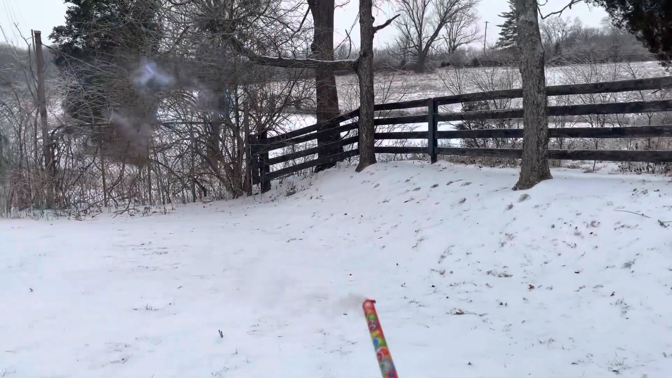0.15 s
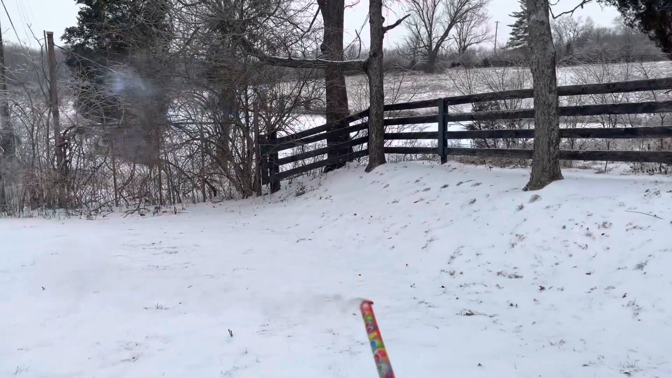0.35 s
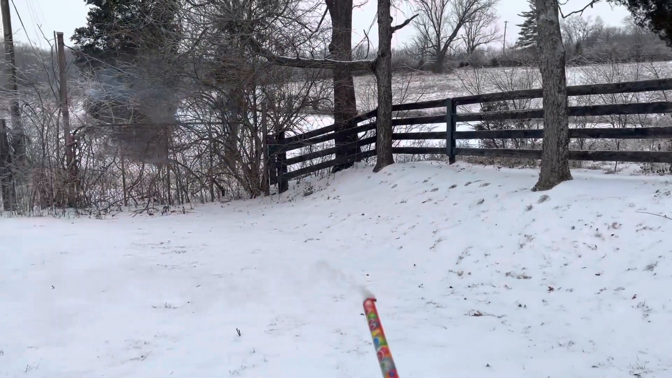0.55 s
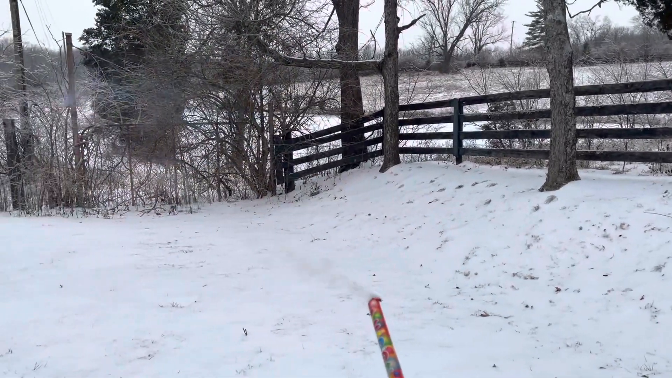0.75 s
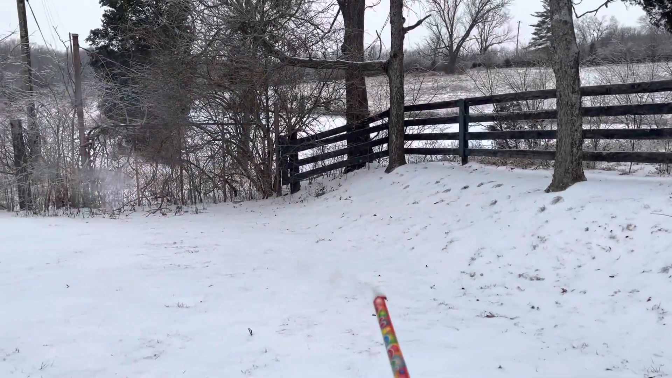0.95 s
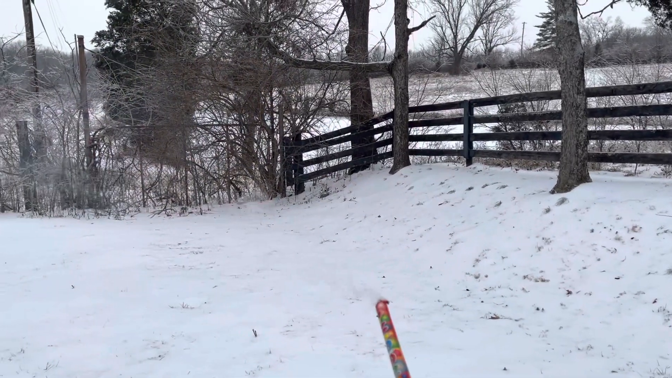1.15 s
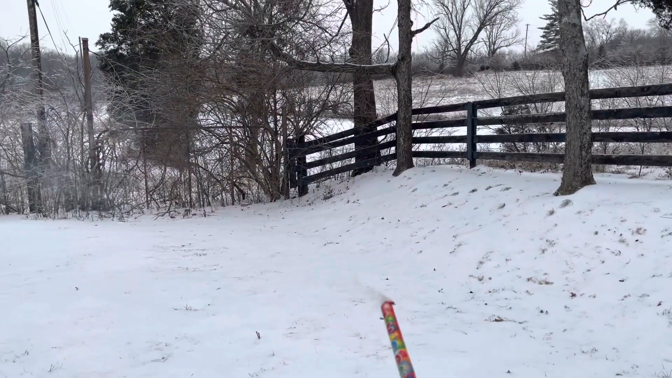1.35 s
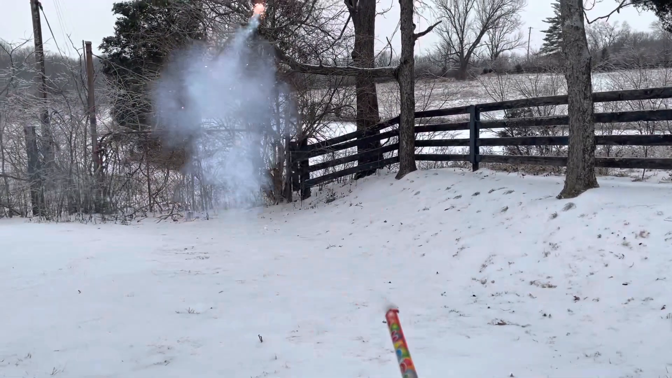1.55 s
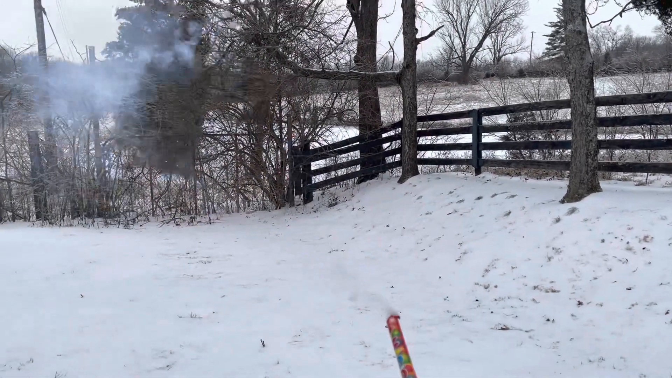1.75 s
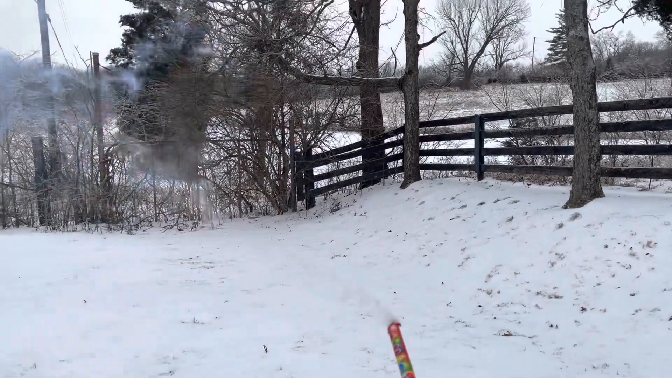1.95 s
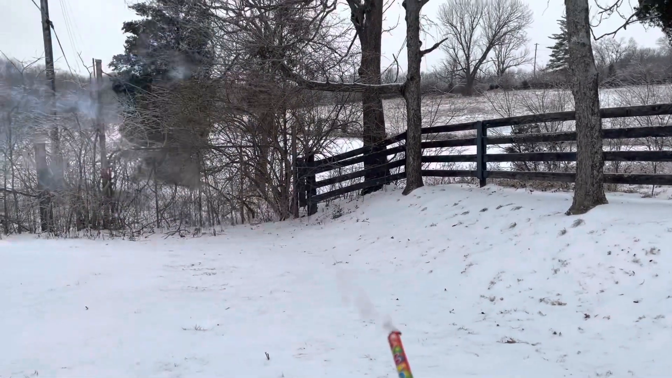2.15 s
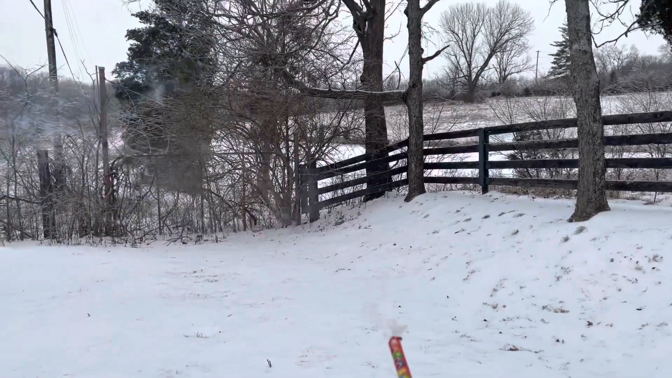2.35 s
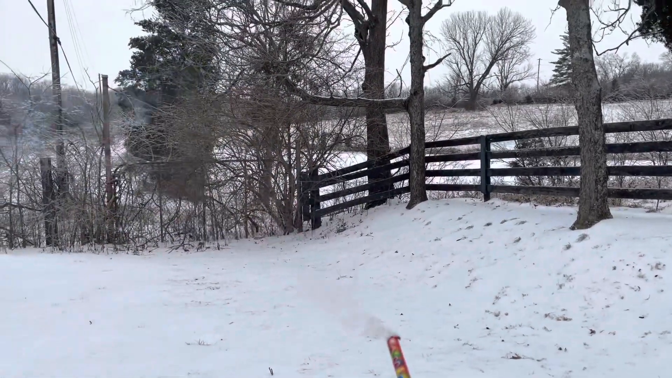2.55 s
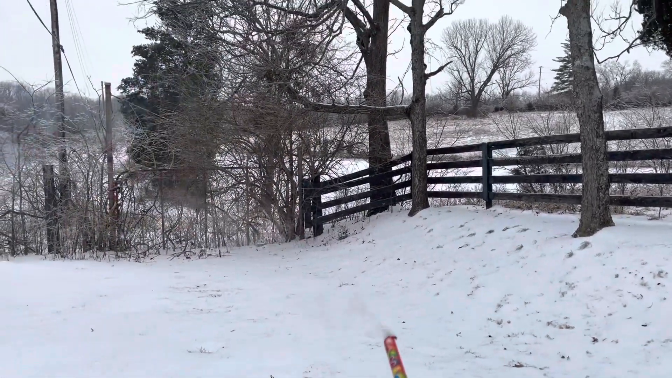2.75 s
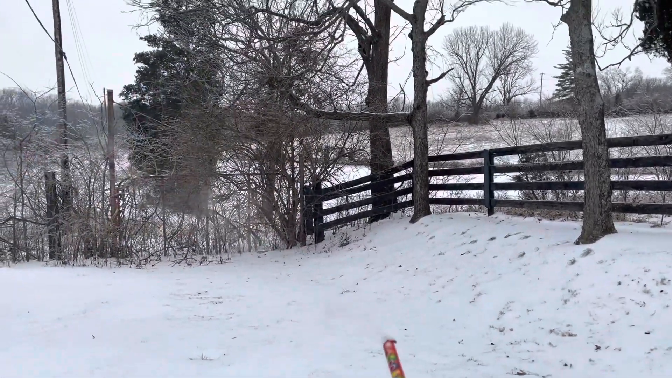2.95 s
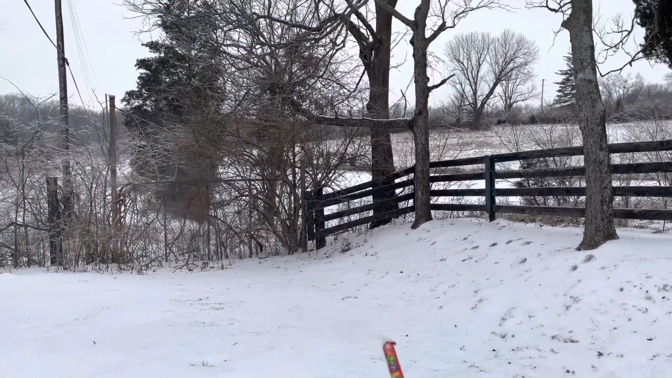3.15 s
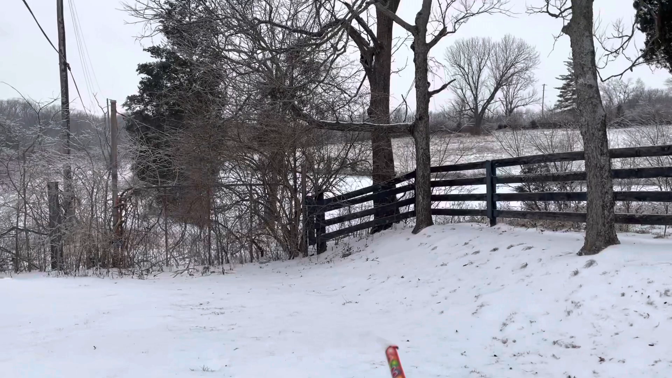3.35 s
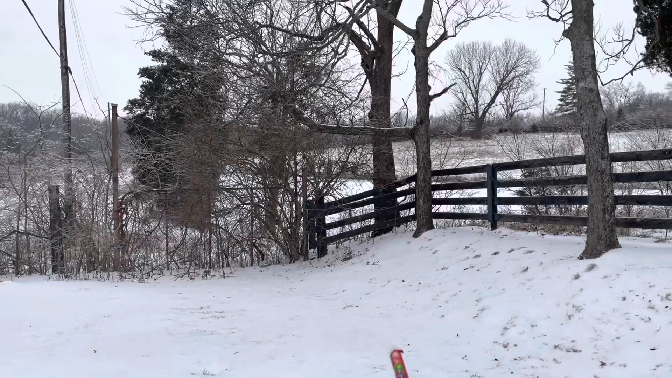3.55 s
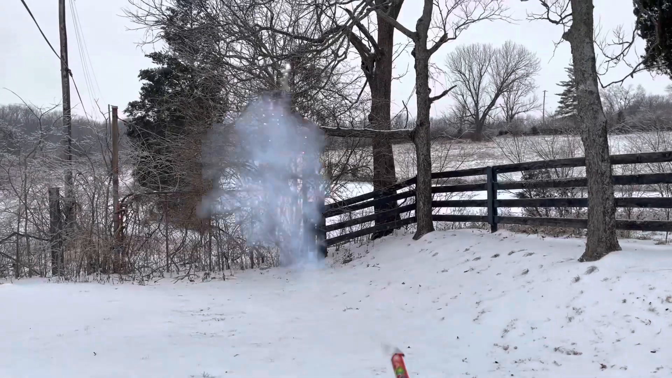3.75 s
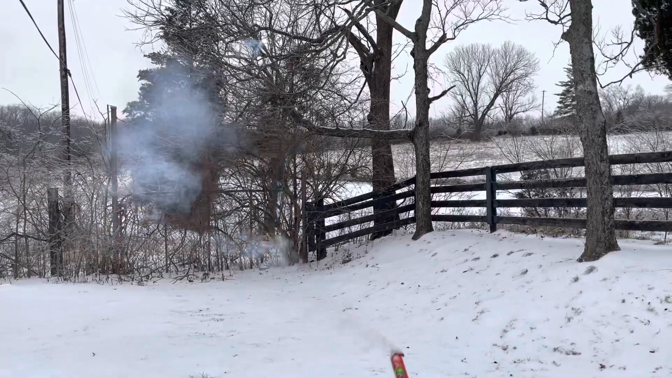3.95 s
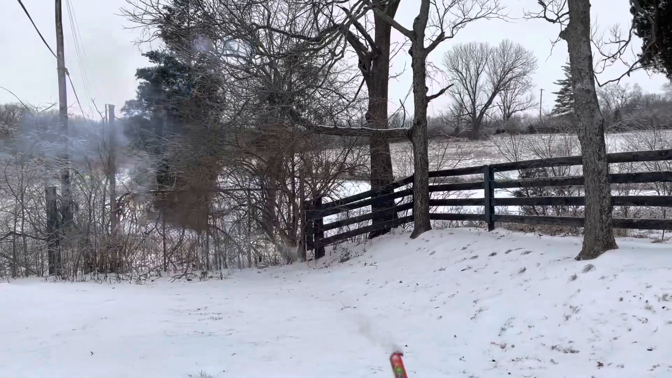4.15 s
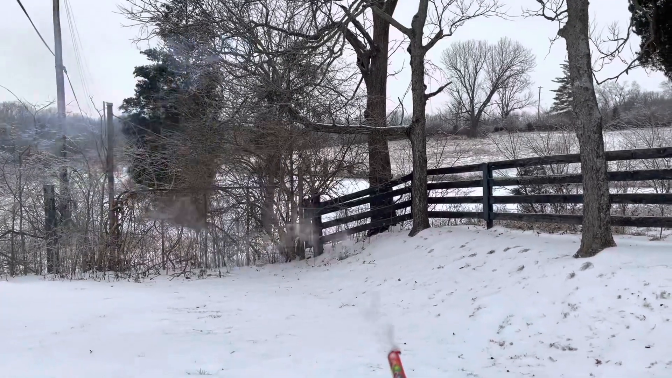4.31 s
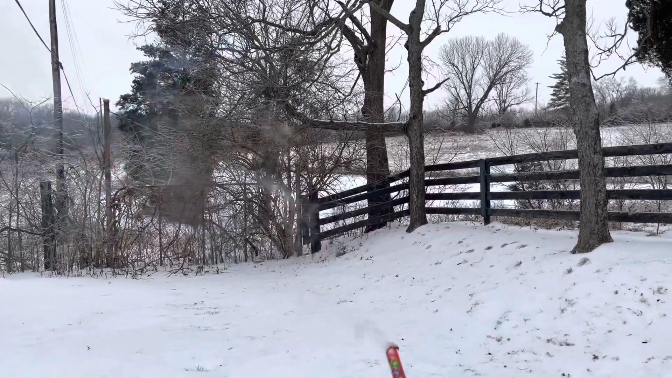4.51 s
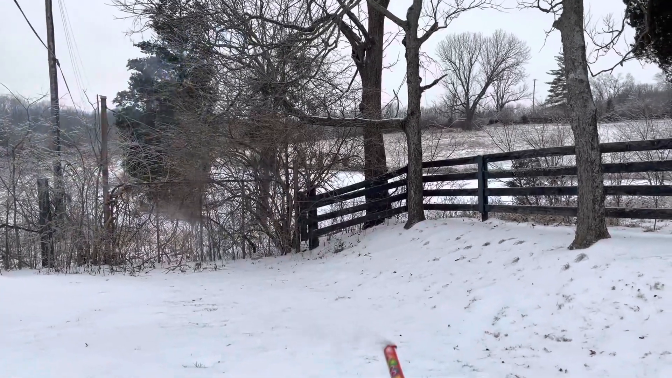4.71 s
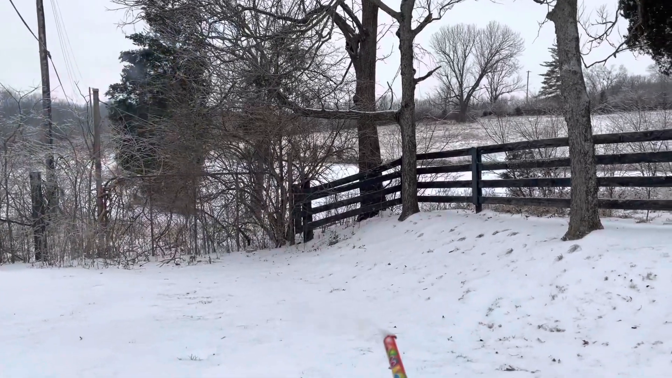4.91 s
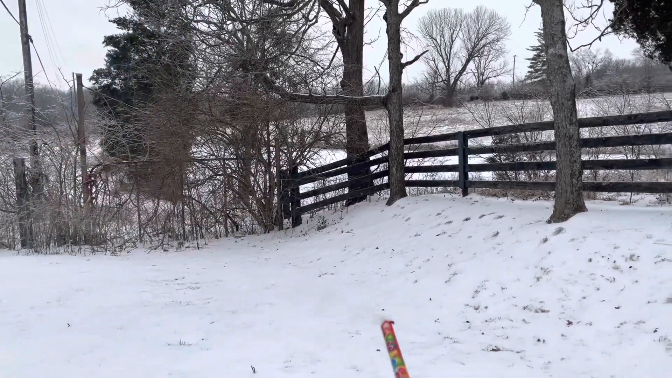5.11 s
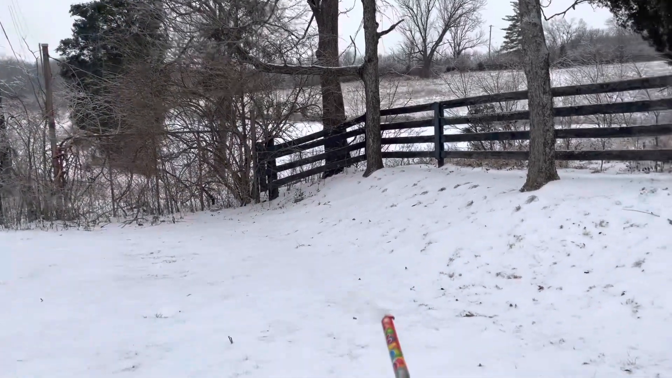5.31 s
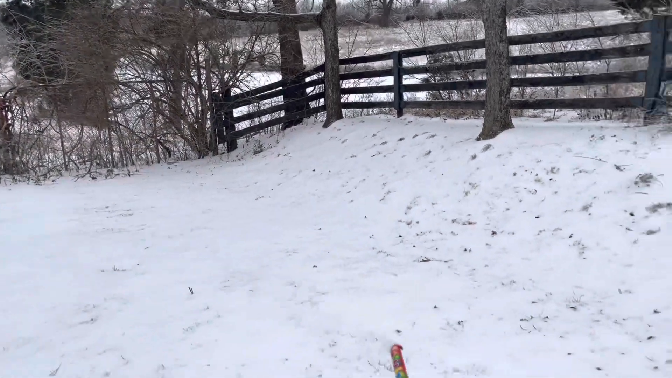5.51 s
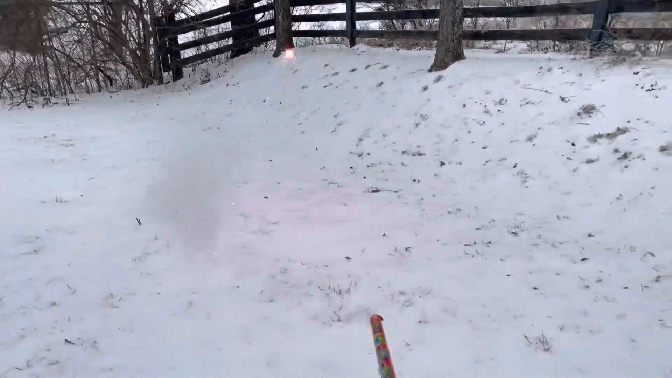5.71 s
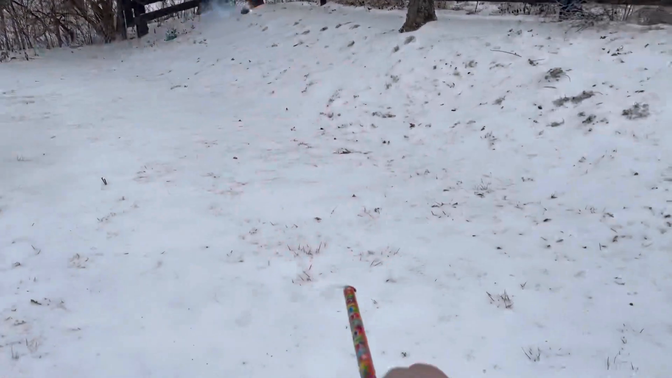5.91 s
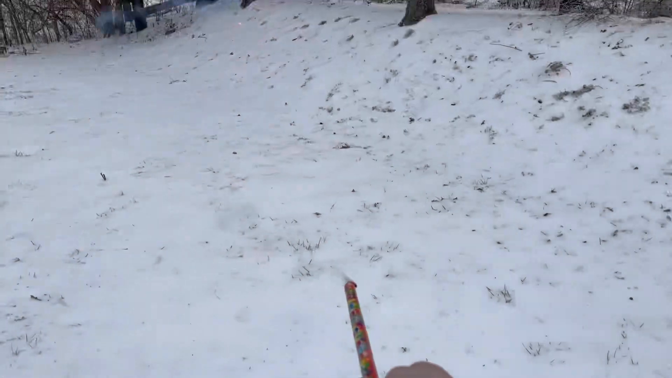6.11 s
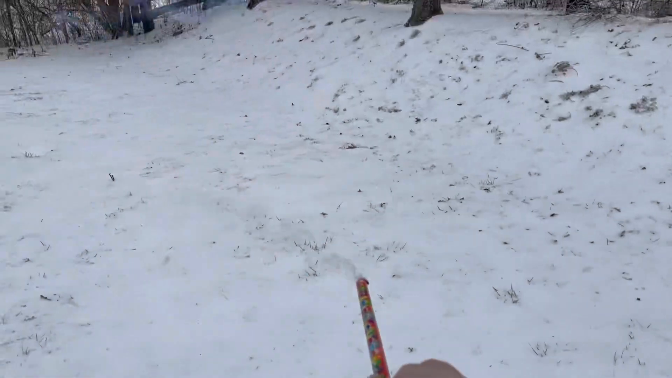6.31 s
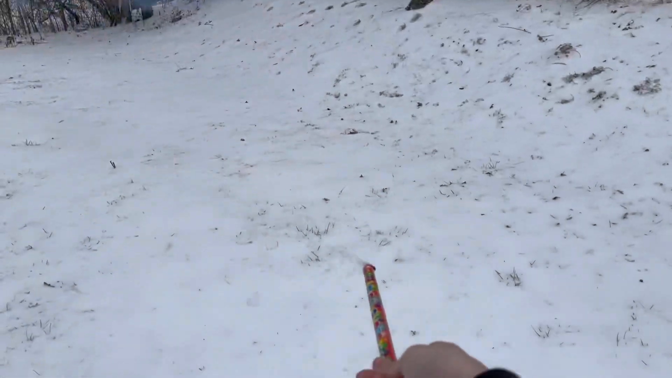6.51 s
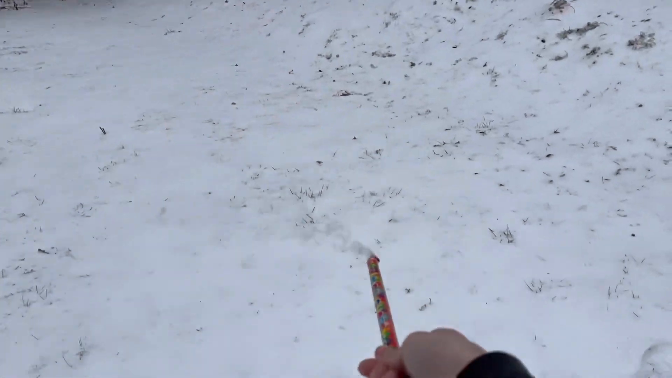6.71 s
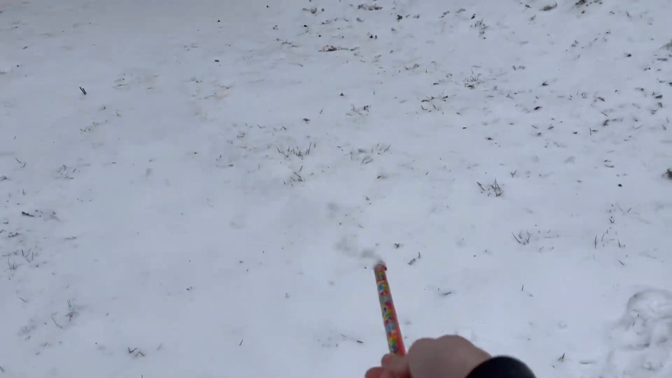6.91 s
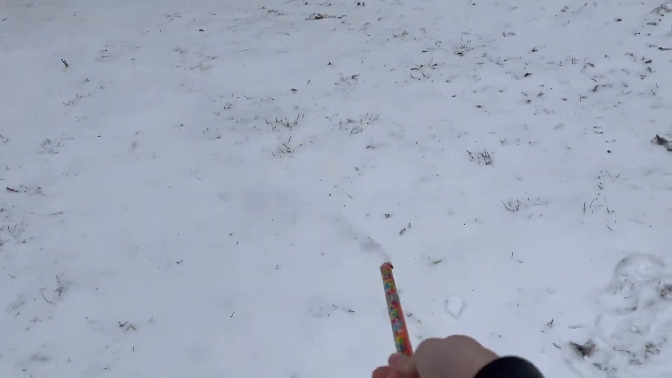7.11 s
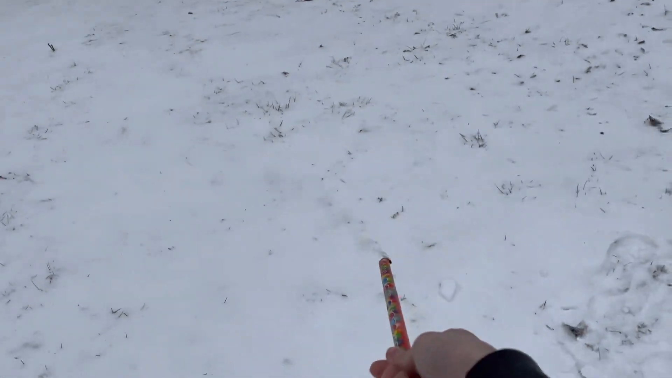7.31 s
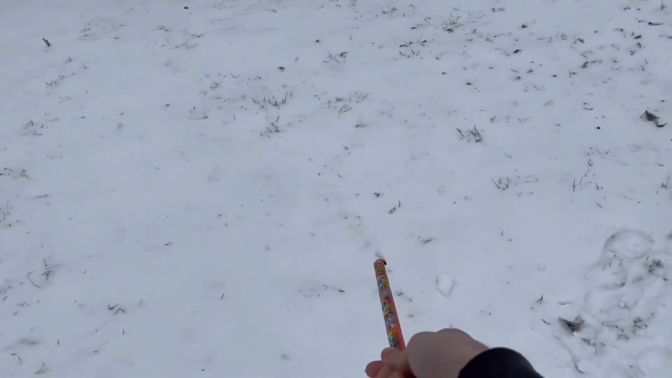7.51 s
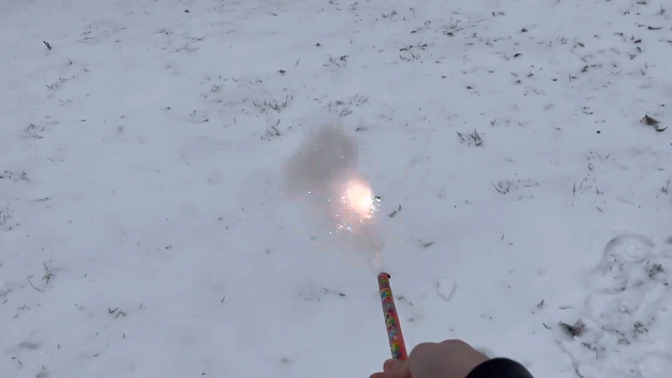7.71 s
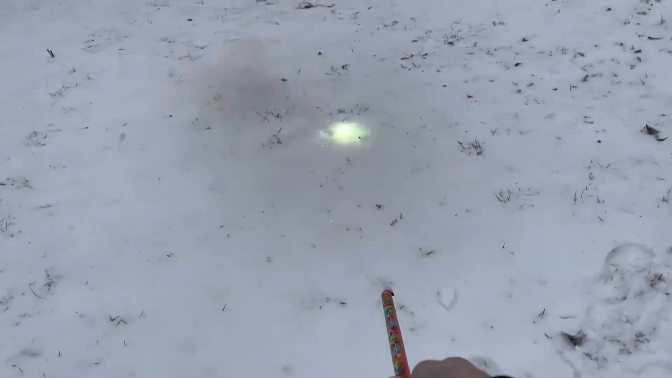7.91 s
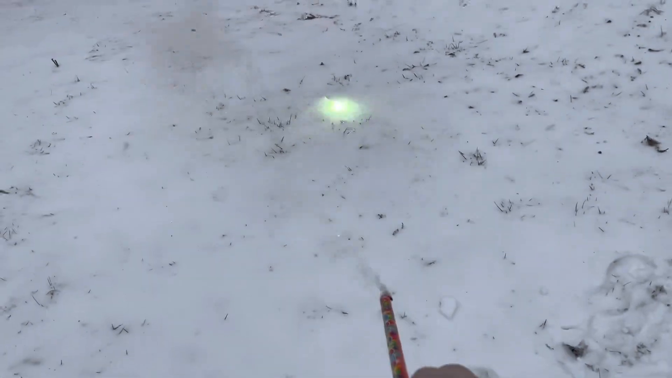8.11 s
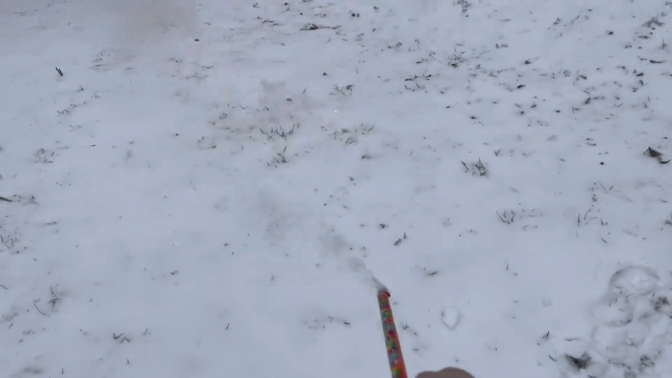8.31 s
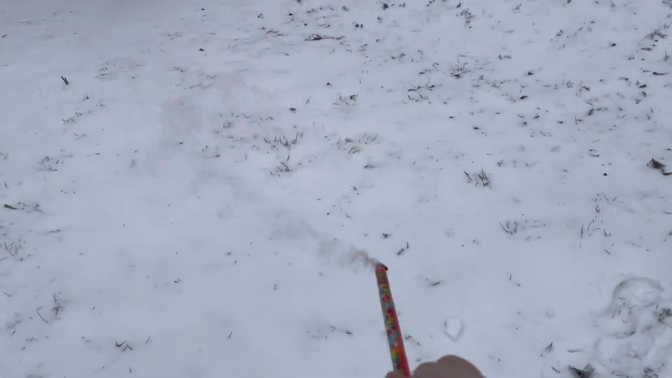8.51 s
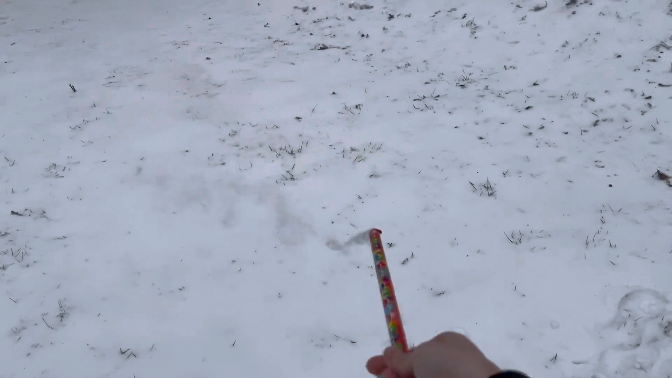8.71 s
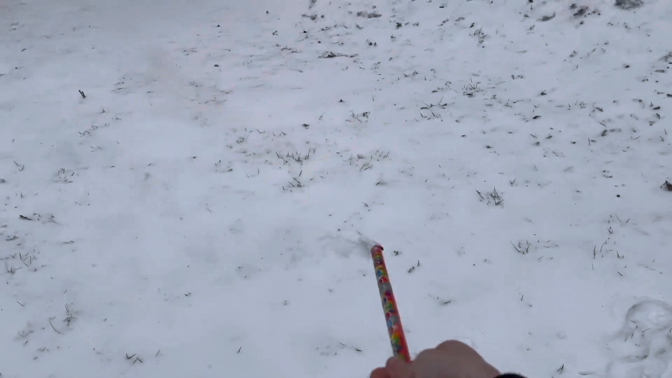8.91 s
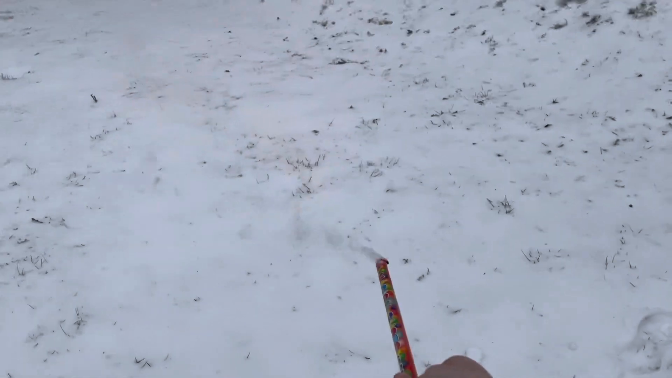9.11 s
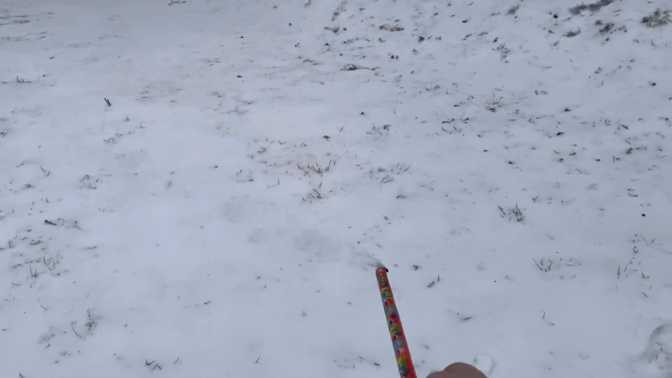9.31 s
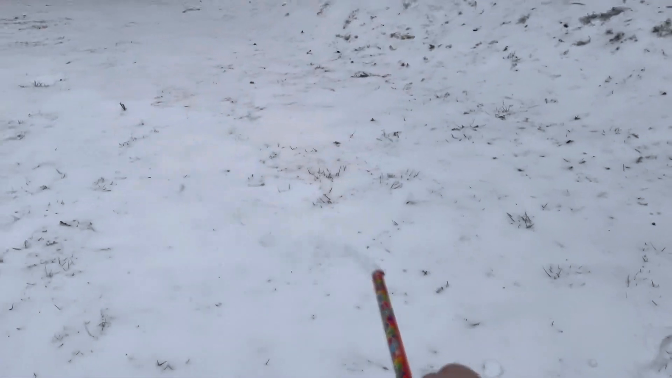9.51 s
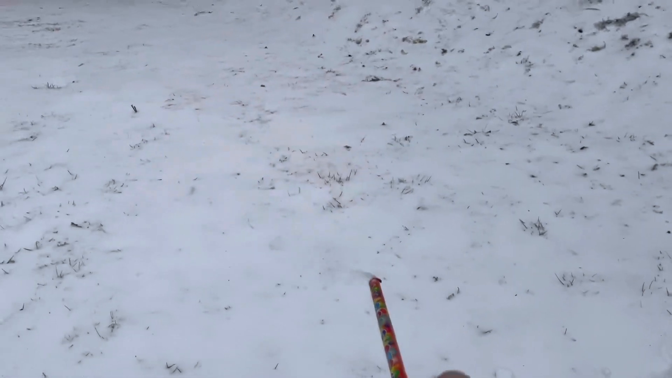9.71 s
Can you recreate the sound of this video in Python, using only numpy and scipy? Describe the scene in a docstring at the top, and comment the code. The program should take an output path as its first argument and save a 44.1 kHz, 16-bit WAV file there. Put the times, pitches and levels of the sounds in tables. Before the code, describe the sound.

Close phone perspective, open snowy ground with little echo. A faint sputtering hiss with a hollow airy tone opens over low wind rumble and a dull distant traffic wash. At 1.3 s a loud sharp pop bursts from the cardboard tube, short and woody, followed by hiss and heavy wind thuds until about 1.9 s. The second pop comes at 3.6 s, its hiss fading over a second, with a wind bump at 4.1 s. The third, at 5.5 s, is thumpier and drier, with small snaps at 5.55 and 5.7 s. The fourth, at 7.6 s, is somewhat softer, then a bright fizz and crackle swell around 7.8 s, with another snap at 8.0 s. Two tiny rising bird chirps sound at 8.5 and 8.8 s, beside a wind thud. Quiet tyre drone comes and goes. The fifth loud pop lands at 9.7 s, with fresh hiss to the end.

```python
"""A hand-held roman candle fires five shots over a snowy field, close to a phone.
Each shot is a noise burst of gas, coloured by the modes of the cardboard tube, with a slow pressure thump.
Between shots the delay charge hisses as sputtering noise with a sinking hollow tone, and powder grains snap.
Wind is low noise in gusts with short eddies; far traffic is a dull wash and narrow bands of tyre noise.
A small bird chirps twice, as a short rising sine with an echo of decaying noise."""
import sys
import numpy as np
from scipy import signal
from scipy.fft import rfft, irfft, next_fast_len
from scipy.io import wavfile
from scipy.ndimage import uniform_filter1d, map_coordinates

SR = 44100
rng = np.random.default_rng(int(sys.argv[2]) if len(sys.argv) > 2 else 0)


def bounce(signal):
    """Save signal as a 16-bit WAV file at the path given by the first command-line argument."""
    frames = np.transpose(np.atleast_2d(signal))
    limited = np.clip(frames, -1, 1)
    pcm = np.round(limited * 32767).astype(np.int16)
    wavfile.write(sys.argv[1], SR, pcm)


N = 429975
T = np.arange(N) / SR  # s
OPPOSED = np.array([[1], [-1]])  # left and right in opposite polarity

# The shots of the candle. Each row: start of the full blast in seconds, gain in dB, swell of the leak in seconds,
# leak in dB against the blast, blast length in seconds, factor on the ring time, factor on the tube pitch,
# thump gain in dB.
SHOTS = [(1.327, -7, 0.0022, -6, 0.0056, 0.95, 1.035, -17.5),
         (3.581, -7.5, 0.0019, 3.5, 0.0039, 1.1, 1.02, -10.5),
         (5.5075, -9.5, 0.0026, -11.5, 0.0086, 0.55, 1.084, -5.5),
         (7.605, -11.5, 0.025, -7.5, 0.01, 0.79, 1.0, -11),
         (9.7353, -7, 0.0035, -2, 0.006, 0.79, 0.96, -15)]


def undb(db):
    """Decibels to gain."""
    return np.exp(np.asarray(db) * (np.log(10) / 20))


def unit(x):
    """Scale to rms 1."""
    return x / np.sqrt(np.mean(x ** 2))


def at(points, hz):
    """Read (Hz, value) points on a log-frequency axis."""
    f, value = np.transpose(points)
    return np.interp(np.log(hz + 1e-3), np.log(f), value)


def shape(x, response):
    """Filter by a response given as a function of frequency."""
    f = np.fft.rfftfreq(x.shape[-1], 1 / SR)
    return irfft(rfft(x) * response(f), x.shape[-1])


def noise(response):
    """Noise of rms 1 with the given response, as long as the scene."""
    f = np.fft.rfftfreq(next_fast_len(N, True), 1 / SR)
    spectrum = rng.standard_normal(2 * len(f)).view(complex)
    return unit(irfft(spectrum * response(f))[:N])


def modes(rows, f):
    """Summed complex response of resonances, each given as (Hz, width in Hz, dB)."""
    return sum(undb(db) * 1j * f * width / (hz ** 2 - f ** 2 + 1j * f * width) for hz, width, db in rows)


def walk(rate):
    """Slow random movement of rms 1, with a spectrum that falls off around the rate in Hz."""
    return noise(lambda f: np.exp(-(f / rate) ** 2))


def wide(response, side_db):
    """Stereo noise: a shared part and an opposed part."""
    return noise(response) + undb(side_db) * noise(response) * OPPOSED


def add(out, s, x):
    """Mix x in at time s, cut at the end."""
    i = int(s * SR)
    out[..., i:i + x.shape[-1]] += x[..., :N - i]


def swells(rows):
    """Gain of overlapping bell-shaped swells (s, dB, half length in s to 1/e of the power)."""
    power = np.zeros(N)
    for s, db, half in rows:
        near = np.abs(T - s) < 4 * half
        power[near] += undb(db) ** 2 * np.exp(-((T[near] - s) / half) ** 2)
    return np.sqrt(power)


def flame():
    """Gains of jet and hollow tone: a charge flares, fades and drops to a smoulder until the next takes over."""
    # The delay charges: the first already burning, the others lit by the first four shots. Each row: flare in dB,
    # flare fade in dB per second, flare length in seconds, smoulder in dB, hollow tone of the flare in dB,
    # hollow tone of the smoulder in dB.
    charges = [(-60, 14, .65, -63.5, -64, -66), (-62, 14, 0.67, -65.5, -65, -66.5),
               (-59.5, 20.5, 0.87, -69, -65, -69.5), (-61, 23.5, 1.23, -62, -63, -68.5),
               (-56.5, 14.5, 0.72, -68, -63.5, -71)]
    # Surges of the flame. Each row: middle in seconds, jet in dB, hollow tone in dB, half length in seconds.
    surges = [(0.652, -77.5, -92, 0.045), (0.954, -76, -88, 0.017), (1.659, -68, -72, .09),
              (4.287, -80, -65, .06), (5.768, -75, -83, 0.031), (6.02, -74, -86, 0.032),
              (7.824, -53.5, -71, 0.092), (8.173, -61, -81, 0.042)]
    first_lit_s, flare_release_s = -0.9, .045
    smoulder_fade, hollow_fade, hollow_smoulder_fade = 11.5, 6, 14  # dB per s

    jet, tone = np.zeros(N), np.zeros(N)
    lit_times = [first_lit_s] + [row[0] for row in SHOTS]
    for lit, (flare_db, fade, length, smoulder_db, hollow_db, hollow_smoulder_db) in zip(lit_times, charges):
        age = np.maximum(T - lit, 0)
        flaring = .5 - .5 * np.tanh((age - length) / (2 * flare_release_s))
        flare = flaring * undb(flare_db - fade * age)
        smoulder = undb(smoulder_db - smoulder_fade * age)
        hollow_flare = flaring * undb(hollow_db - hollow_fade * age)
        hollow_smoulder = undb(hollow_smoulder_db - hollow_smoulder_fade * age)
        jet = np.where(T >= lit, np.hypot(flare, smoulder), jet)
        tone = np.where(T >= lit, np.hypot(hollow_flare, hollow_smoulder), tone)
    jet_surge = swells([(s, db, half) for s, db, _, half in surges])
    tone_surge = swells([(s, db, half) for s, _, db, half in surges])
    return np.hypot(jet, jet_surge), np.hypot(tone, tone_surge)


def column():
    """Flame noise rings the air in the tube; the resonances sink as the charge burns deeper."""
    # The air column above each charge as its stretch begins, at time zero or at a shot.
    # Each row: lowest resonance in Hz, spacing in Hz, width in Hz.
    bore = [(3520, 2380, 950), (3250, 2080, 1000), (2750, 1900, 900), (2270, 1630, 850), (2080, 1520, 900)]
    out = np.zeros(N)
    starts = [0] + [row[0] for row in SHOTS]
    for start, end, (lowest, spacing, width) in zip(starts, starts[1:], bore):
        series = [(lowest + k * spacing, width, -1.5 * k) for k in range(4)]
        tone = noise(lambda f: sum(np.abs(modes([row], f)) ** 3 for row in series))
        # reading the noise ever more slowly lowers its pitch
        sink = np.exp(-.072 * T[:int((end - start) * SR)])
        add(out, start, map_coordinates(tone[:len(sink) + 1], [np.cumsum(sink)]))
    return out


def burn():
    """The burning delay charge: a sputtering jet of hiss and grains, with a hollow tone from the tube."""
    # Colour of the jet. Each row: frequency in Hz, relative level per Hz in dB.
    jet_colour = [(600, -7.5), (1500, 2), (2700, 1), (4300, -5.5), (5200, -4), (5600, -6), (6500, -3),
                  (8600, 5.5), (10500, 2), (12300, -5.5), (13700, -2), (16000, -6)]
    strength, hollow = flame()
    jet_db = 20 * np.log10(strength)
    # a stronger jet sputters more deeply
    sputter_depth_db = np.interp(jet_db, [-75, -55], [.8, 1.6])
    sputter = undb(sputter_depth_db * walk(45))
    struck = rng.random(N) < 250 / SR  # about 250 grains per second
    grains = struck * rng.standard_normal(N) * undb(2.8 * rng.standard_normal(N))
    fizz = rng.standard_normal(N) + undb(-8) * unit(grains)
    jet = unit(shape(fizz, lambda f: undb(at(jet_colour, f)))) * undb(jet_db + 6.5)
    hollow_tone = column() * hollow * undb(0.96 * walk(25))
    return (jet + hollow_tone) * sputter


def wind():
    """Turbulence on the microphone ports: stronger gusts reach higher, and single eddies thud."""
    # Colour of the rumble. Each row: frequency in Hz, relative level per Hz in dB.
    rumble_colour = [(20, -18), (35, -6), (58, 2), (110, -1), (190, -10), (300, -15.5), (500, -36),
                     (1000, -64)]
    # Gusts on the microphone. Each row: middle in seconds, relative level in dB, half length in seconds.
    gusts = [(0.11, -42, .07), (0.45, -43.5, .16), (1.11, -38, .07), (1.66, -37.5, 0.21), (2.15, -37, 0.04),
             (2.49, -43.5, .11), (3.55, -45.5, .08), (3.85, -47, .1), (4.13, -33, 0.053),
             (4.47, -41.5, 0.19), (4.88, -49, .07), (5.25, -50.5, .08), (5.8, -45, 0.19), (6.33, -43, 0.05),
             (6.55, -44, 0.09), (7.02, -50, 0.033), (7.32, -45, .1), (7.94, -44, .13), (8.6, -41, 0.16),
             (9.03, -47.5, 0.063), (9.55, -47, .06)]
    # Single eddies. Each row: middle in seconds, rms of the shared part at its height in dB,
    # length (bell sigma) in seconds, upper edge in Hz.
    eddies = [(0.126, -39.5, 0.013, 290), (1.277, -26.5, 0.0068, 241), (1.423, -27, 0.0033, 189),
              (1.63, -34, 0.012, 373), (1.678, -26.5, 0.0067, 450), (1.787, -19, 0.0024, 494),
              (1.795, -17.5, 0.0044, 129), (1.9, -39.5, 0.019, 365), (2.143, -41, 0.014, 132),
              (4.1, -43, 0.004, 267), (4.129, -30, 0.0067, 241), (4.178, -36, 0.0034, 262),
              (4.349, -36.5, 0.005, 200), (4.562, -40.5, 0.012, 203), (5.879, -44, 0.0058, 230),
              (6.045, -41, 0.0054, 228), (6.312, -39, .004, 200), (7.004, -36.5, 0.0073, 167.6),
              (7.251, -39, 0.009, 220), (7.508, -48.5, 0.04, 327), (7.942, -32, 0.003, 175),
              (8.861, -27.5, 0.0048, 257), (9.097, -44, 0.0084, 298)]
    lull_db = -54.5  # the breeze between gusts

    gust_db = 20 * np.log10(np.hypot(swells(gusts), undb(lull_db)))
    swirl_db = 2.8 * walk(35)
    out = wide(lambda f: undb(at(rumble_colour, f)), -4.5) * undb(gust_db - 1 + swirl_db)
    # the higher flutter grows faster than the rumble, up to a ceiling
    flutter_db = -61 + 1.1 * (np.minimum(gust_db, -38) + 41.0)
    flutter = wide(lambda f: modes([(190, 270, 0)], f) ** 3, -8.0)
    out += flutter * undb(flutter_db + swirl_db)

    t = np.arange(-SR // 10, SR // 10) / SR
    for s, db, length, hz in eddies:
        env = np.exp(-(t / length) ** 2 / 2)

        def thud(f):
            return f / (f + 60) / (1 + (f / hz) ** 2) * np.exp(-(f / hz / 2) ** 4)

        mid, side = shape(rng.standard_normal((2, len(t))) * env, thud)
        eddy = unit(mid) + .3 * unit(side) * OPPOSED
        add(out, s + t[0], undb(db) * np.sqrt(np.mean(env ** 2)) * eddy)
    return out


def passing(s, db, half):
    """Gain of a source that goes by at a steady speed: loudest at s, 3 dB down after half seconds."""
    return undb(db) / np.hypot(1, (T - s) / half)


def traffic():
    """A far road: a dull wash, with tyres that whine and drone; it widens as the phone tips to the ground."""
    # Colour of the wash. Each row: frequency in Hz, relative level per Hz in dB.
    far_colour = [(60, 0.5), (200, 0), (400, -0.5), (750, -3), (1000, -5.5), (1400, -13.5), (2000, -22),
                  (3000, -45.5), (5000, -48), (10000, -45.5), (14000, -39.5)]
    # Colour of the opposed part against the shared part, before rms scaling. Each row: frequency in Hz, dB.
    side_colour = [(100, -2), (300, -2), (550, 1.5), (800, -1.5), (1500, -5.5), (3000, -6), (14000, -7)]
    # Swells of the tyre drone. Each row: middle in seconds, gain in dB, half length in seconds.
    drones = [(6.33, -60, .13), (7.03, -61.5, 0.14), (7.5, -63.5, .15), (8.43, -57.5, 0.25)]
    # the tilt moves the road off to the side
    middle_s, lag_s, wider_db = 6.0, .45, 5

    side_db = wider_db * (.5 + .5 * np.tanh((T - middle_s) / (2 * lag_s)))
    shared = noise(lambda f: undb(at(far_colour, f)))
    opposed = noise(lambda f: undb(at(far_colour, f) + at(side_colour, f))) * undb(side_db - 1.26) * OPPOSED
    wash = (shared + opposed) * passing(s=3.3, db=-54.6, half=4) * undb(.5 * walk(3.7))
    whine = wide(lambda f: modes([(741.3, 120, 0)], f) ** 2, side_db - 3)
    whine = whine * passing(s=1.9, db=-58.5, half=2.1)
    drone = wide(lambda f: modes([(470.5, 20, 0)], f) ** 2, side_db + 1) * swells(drones)
    return wash + whine + drone


def shot(db, swell, leak_db, length, ring, pitch, thump_db, t):
    """Gas leaks past the ball, blasts out and dies away, treble first; a slow pressure swing follows."""
    # Colour of the gas blast. Each row: frequency in Hz, relative level per Hz in dB.
    blast_colour = [(40, -21), (110, -5.5), (250, -2), (420, -6), (600, -9), (1000, -3), (1450, -15),
                    (2000, -10.5), (3000, -13.5), (4500, -19.5), (7000, -20), (9000, -10), (12000, -22),
                    (16000, -27)]
    # Dying away of the blast. Each row: frequency in Hz, t60 in seconds before the shot's ring factor.
    blast_t60 = [(100, 0.096), (400, 0.072), (1500, .065), (5000, .06), (12000, 0.047)]
    # Tube modes before the shot's pitch factor. Each row: frequency in Hz, width in Hz, level in dB.
    tube_modes = [(243, 15, -6.5), (388, 36, 5), (820, 45, -2.5), (905, 21, -3), (1420, 81, 0),
                  (1723, 76, 5.5), (2510, 120, -2), (2810, 29, 4.5), (3140, 88, -2), (3685, 27, 2),
                  (6900, 60, 2.5)]

    gas = shape(rng.standard_normal(len(t)),
                lambda f: undb(at(blast_colour, f)) * (.9 + modes(tube_modes, f / pitch)))
    centres = np.geomspace(80, 14000, num=18)  # Hz, overlapping bands
    out = 0
    for hz, share in zip(centres, np.eye(len(centres))):
        band = shape(gas, lambda f: at(np.c_[centres, share], f))
        # the lows build up later
        age = t - .004 / (1 + (hz / 500) ** 2)
        leak = undb(leak_db) * np.exp(np.minimum(age, 0) / swell) / (1 + (age / 0.015) ** 8)
        t60 = ring * at(blast_t60, hz)
        blast = np.exp(-np.log(1000) * np.maximum(age - length, 0) / t60)
        # smooth over half a cycle of the band
        env = uniform_filter1d(np.where(age < 0, leak, blast), int(SR / hz / 2) + 1)
        # every band carries its fixed share of the charge's energy
        out = out + unit(band * env) * np.std(band) * np.sqrt(np.mean(env ** 2))
    swing = (t - length) / .003
    thump = -swing * np.exp(-swing ** 2 / 2)
    return undb(db) * (out / np.std(gas) + undb(thump_db) * thump)


def shots():
    """All shots, with faint scatter from the trees and the fence as a decaying noise tail."""
    out, lead = np.zeros(N), .06  # s of leak ahead of the blast
    t = np.arange(SR // 3) / SR
    for s, *row in SHOTS:
        add(out, s - lead, shot(*row, t - lead))
    scatter = rng.standard_normal(len(t)) * np.exp(-np.log(1000) * t / 0.88) * (1 - np.exp(-t / 0.042))
    scatter = shape(scatter, lambda f: 1 / (1 + 1j * f / 2500))
    echo = signal.fftconvolve(out, scatter / np.linalg.norm(scatter))[:N]
    return out + undb(-39.5) * echo


def sparks():
    """Grains of powder snap in the flame: short resonant noise bursts."""
    # The snaps. Each row: start in seconds, peak in dB, pitch in Hz.
    snaps = [(3.8024, -57, 8200), (5.549, -30.5, 3480), (5.7317, -40, 6830), (7.309, -59, 7000),
             (7.7783, -31, 8000), (8.016, -40, 7000), (8.672, -49.5, 9000), (9.02, -65, 2000),
             (9.662, -57, 13070)]
    out, t = np.zeros(N), np.arange(SR // 30) / SR
    for s, db, hz in snaps:
        burst = rng.standard_normal(len(t)) * np.exp(-t / 0.0026)
        snap = shape(burst, lambda f: modes([(hz, 0.54 * hz, 0)], f))
        add(out, s, undb(db) * snap / np.abs(snap).max())
    return out


def bird():
    """A thin whistle gliding up from 5600 towards 8400 Hz, blurred by the trees."""
    # The chirps. Each row: start in seconds, gain in dB.
    chirps = [(8.510, -58.5), (8.805, -59.5)]
    out, t = np.zeros((2, N)), np.arange(SR // 6) / SR
    hz = 8400 - 2800 * np.exp(-t / 0.0082)
    whistle = np.sin(2 * np.pi * np.cumsum(hz) / SR)
    note = whistle * (1 - np.exp(-t / 0.0025)) * np.exp(-t / 0.015)
    trees = rng.standard_normal((2, len(t))) * np.exp(-t / 0.045)
    echo = signal.fftconvolve(note[None], trees / np.linalg.norm(trees[0]))
    for s, db in chirps:
        add(out, s, undb(db) * note * np.array([[1], [.6]]))  # stronger on the left
        add(out, s, undb(db + 0.5) * echo)
    return out


def scene():
    """The candle reaches the two microphone ports with different phase; wind, road and bird surround it."""
    # Phase between the ports for sound from the tube. Each row: frequency in Hz, lead of the left in radians.
    port_phase = [(200, 0), (860, .45), (1380, 0), (2500, .7), (5340, 1.4), (5770, -1.9), (6290, -.7),
                  (6890, -.4), (7750, -2.9), (9390, -3.3), (11200, -4.9), (12600, -6.28)]
    candle = shots() + burn() + sparks()
    candle = np.pad(candle, (0, next_fast_len(N + SR // 10, True) - N))
    ports = [shape(candle, lambda f: np.exp(.5j * sign * at(port_phase, f)))[:N] for sign in (1, -1)]
    return np.array(ports) + wind() + traffic() + bird()


def record(dry):
    """The phone thins the deepest bass, rounds the loudest peaks and cuts the top."""
    top_hz = 15800
    thinned = signal.sosfilt(signal.butter(2, 35, "high", fs=SR, output="sos"), dry)
    rounded = thinned / (1 + (thinned / .95) ** 4) ** .25
    return signal.sosfilt(signal.ellip(10, .1, 80, top_hz, fs=SR, output="sos"), rounded)


dry = scene()
out = record(dry)
bounce(out)
```